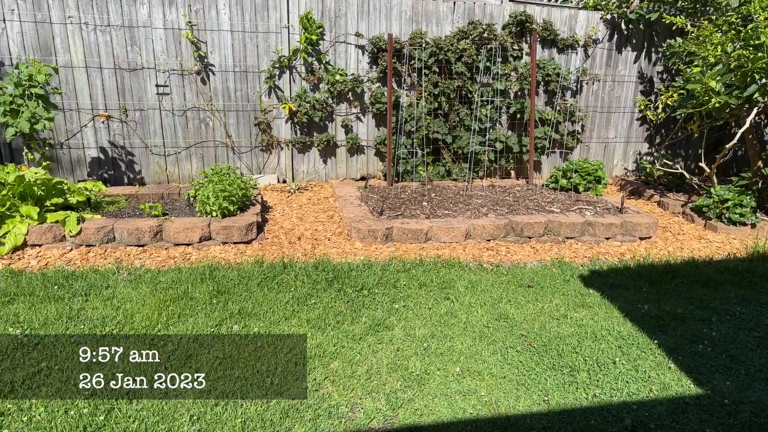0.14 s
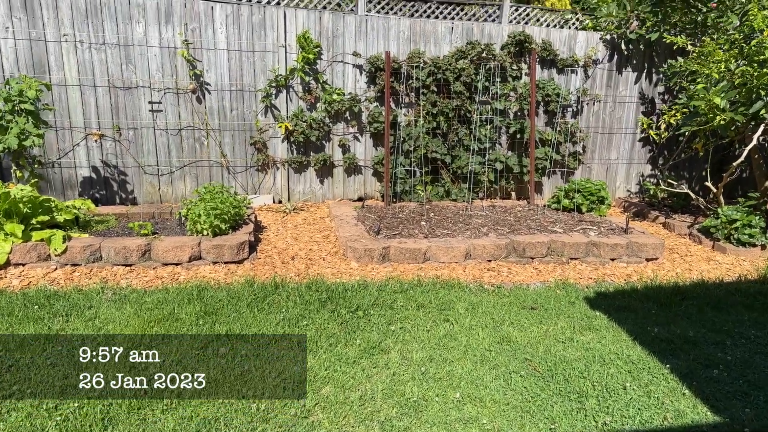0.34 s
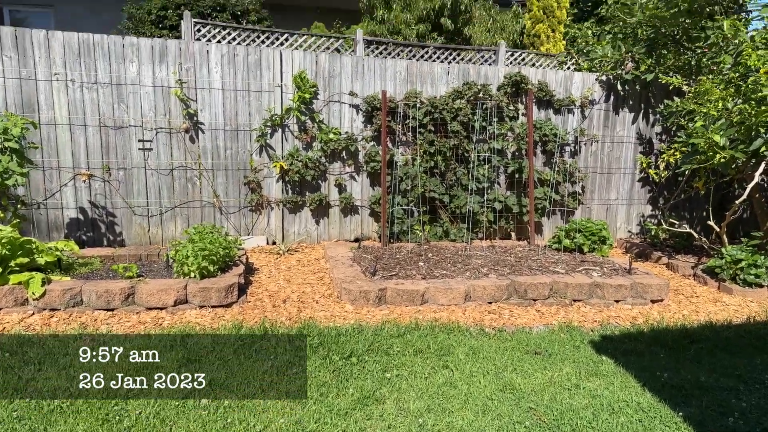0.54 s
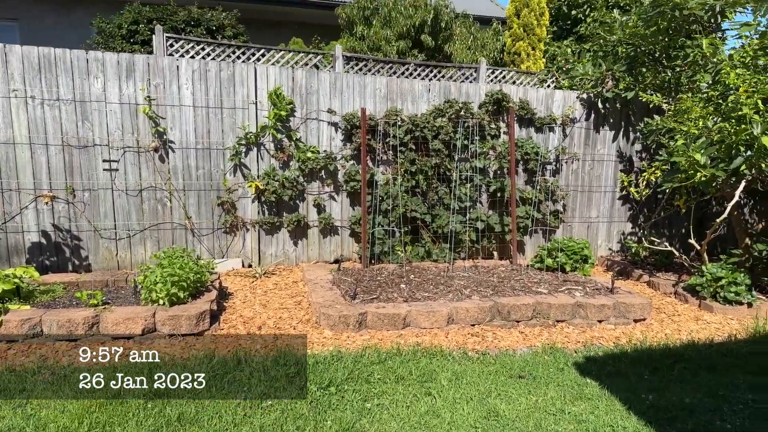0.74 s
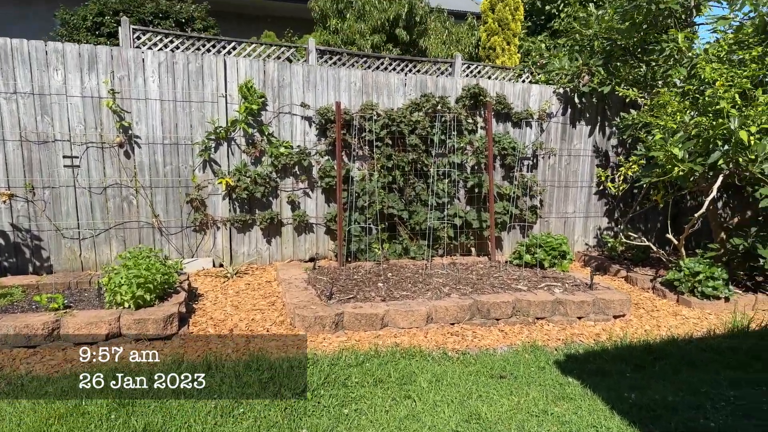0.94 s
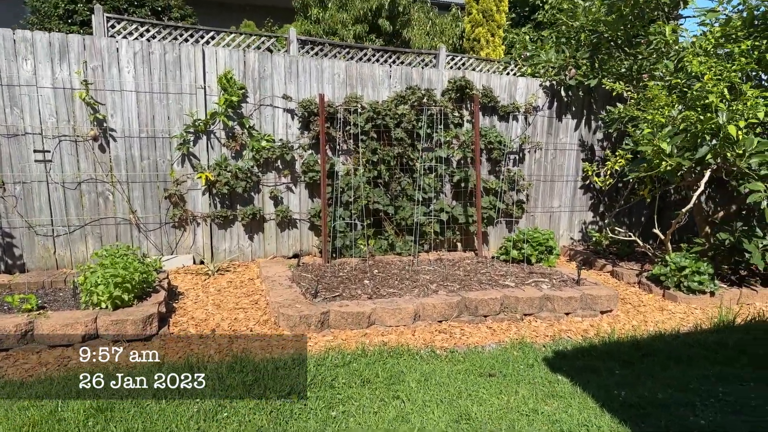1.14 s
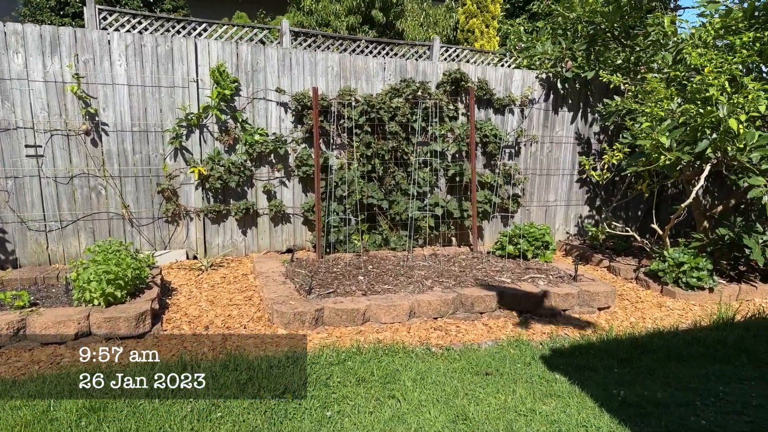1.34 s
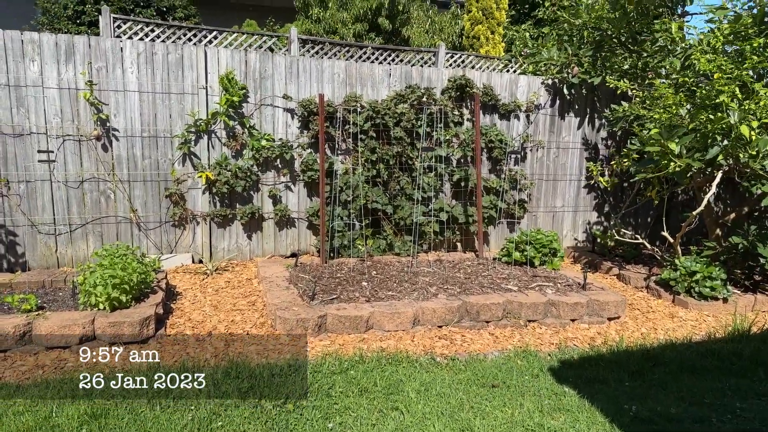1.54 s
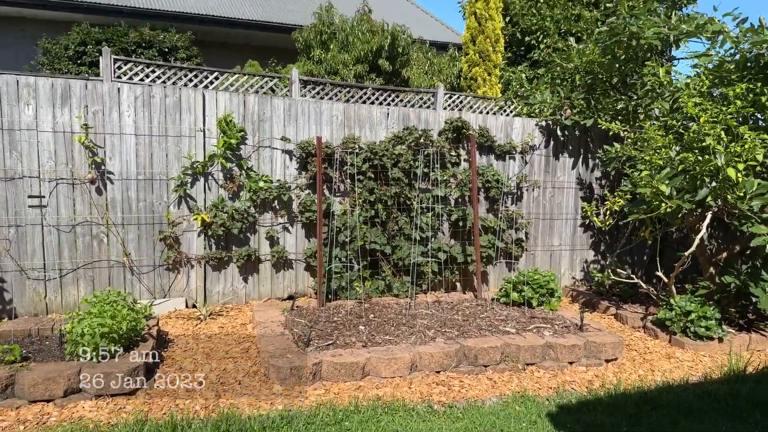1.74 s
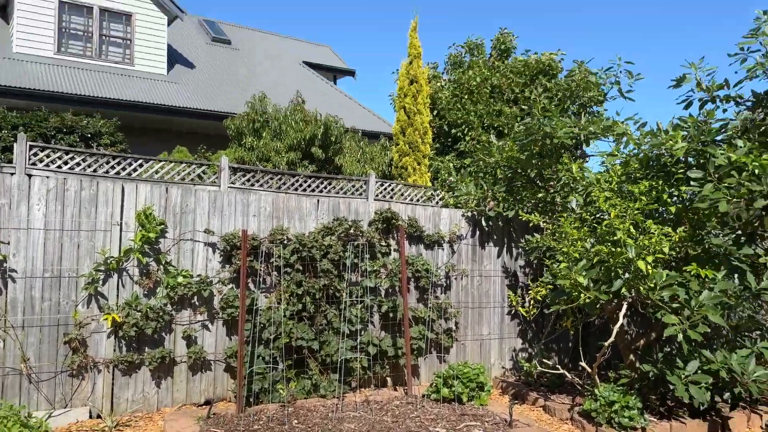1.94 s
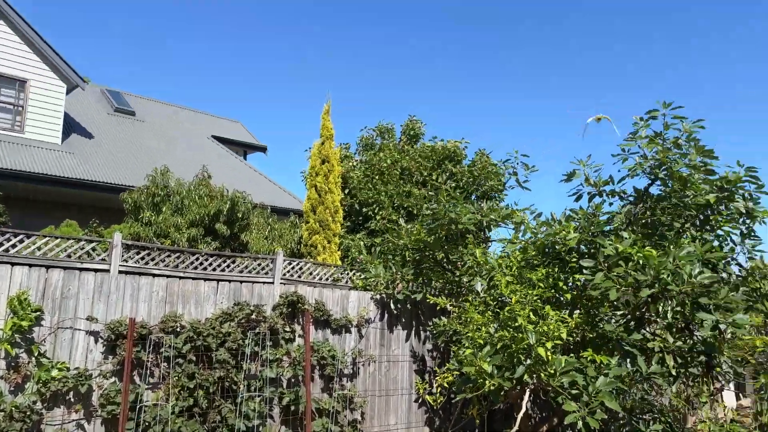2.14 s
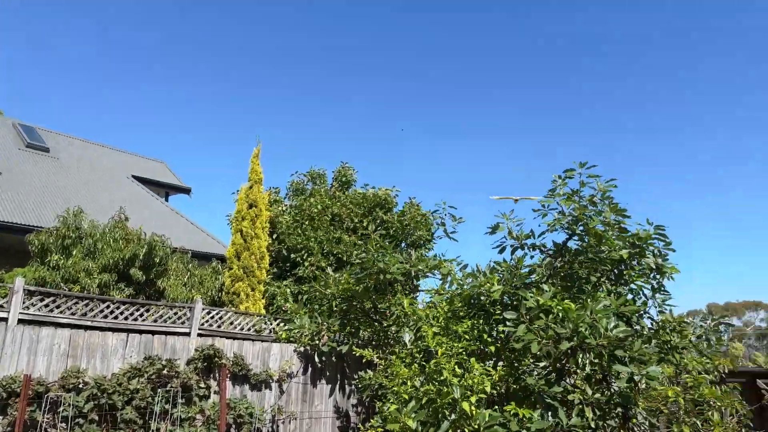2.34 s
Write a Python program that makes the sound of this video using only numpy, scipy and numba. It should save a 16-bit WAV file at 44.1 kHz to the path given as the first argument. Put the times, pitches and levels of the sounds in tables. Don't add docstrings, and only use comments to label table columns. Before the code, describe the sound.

A cockatoo screeches harshly twice over a backyard garden, with short echoes and light wind buffets

```python
import sys
import numpy as np
from scipy import signal
from scipy.fft import rfft, irfft
from scipy.io import wavfile
from numba import njit

SR = 44100
rng = np.random.default_rng(int(sys.argv[2]) if len(sys.argv) > 2 else 0)


def boost(x):
    u = np.asarray(x, float) / 20
    return 10 ** u


def generate_wav(signal):
    frames = np.transpose(np.atleast_2d(signal))
    scaled = np.clip(frames, -1, 1) * 32767
    pcm = np.round(scaled).astype(np.int16)
    wavfile.write(sys.argv[1], SR, pcm)


N = 105090


def rms_one(x):
    return x / np.sqrt(np.mean(x ** 2) + 1e-20)


def in_time(rows):
    s, *columns = np.transpose(rows)
    return [np.interp(np.arange(N) / SR, s, c) for c in columns]


def drift(rate_hz):
    r = np.exp(-2 * np.pi * rate_hz / SR)
    return rms_one(signal.lfilter([1], [1, -2 * r, r * r], rng.standard_normal(N + SR))[SR:])


def low_pass(x, order, cut_hz):
    return signal.sosfilt(signal.butter(order, cut_hz, fs=SR, output="sos"), x)


def band_pass(x, low_hz, top_hz):
    return signal.sosfilt(signal.butter(2, [low_hz, top_hz], "band", fs=SR, output="sos"), x)


def bump(t, centre_s, length_s):
    return np.exp(-((t - centre_s) / length_s * 2) ** 2)


@njit
def moving(x, c, r):
    y = np.zeros(len(x))
    for i in range(2, len(x)):
        y[i] = (1 - r * r) / 2 * (x[i] - x[i - 2]) + 2 * r * c[i] * y[i - 1] - r * r * y[i - 2]
    return y


def resonance(x, hz, width_hz):
    return moving(x, np.cos(2 * np.pi * np.clip(hz, 50, .45 * SR) / SR), np.exp(-np.pi * width_hz / SR))


def rings(source, table, stretch):
    wander, swell_db = .015, 1.5
    total = 0
    for k, (hz, width_hz, db) in enumerate(table):
        gain = (-1) ** k * boost(db + swell_db * drift(5.4))
        centre_hz = hz * stretch * (1 + wander * drift(10))
        total = total + gain * resonance(source, centre_hz, width_hz)
    return total


def voice_box(start_s):
    steady_hz, onset_hz, speed_up_s = 480, 110, .03
    rate_wander, jitter, spread_db, flutter_db, puff_decay_s = .12, .24, 2.5, 1.0, .002
    t = np.arange(N) / SR
    rate_hz = steady_hz + (onset_hz - steady_hz) * np.exp(-np.abs(t - start_s) / speed_up_s)
    rate_hz = rate_hz * np.exp(rate_wander * drift(12))
    gaps, sizes = rng.standard_normal((2, 3000))
    marks = np.cumsum(np.exp(jitter * gaps - jitter ** 2 / 2))
    pulses = np.zeros(N + 1)
    pulses[np.searchsorted(np.cumsum(rate_hz) / SR, marks)] = boost(spread_db * sizes)
    pulses = pulses[:N]
    puff_level = signal.lfilter([1], [1, -np.exp(-1 / (puff_decay_s * SR))], pulses)
    puffs = puff_level * rng.standard_normal(N)
    return np.array([rms_one(pulses), rms_one(puffs)]) * boost(flutter_db * drift(6.2))


def screech(effort, beak, chest, lower, upper, beak_rings, stretch_s):
    breath_db, beak_air_db = -7, -0.5
    pipe_cut_hz, voice_low_cut_hz = 5500, 340
    notch_width_hz, notch_depth = 1100, .85
    neck_stretch, release_s = 0.26, 0.0043
    start_s, end_s = effort[0][0], effort[-1][0]
    level_db, chest_db, gape_db, bright_db = in_time(effort)
    notch_hz, = in_time(beak)
    t = np.arange(N) / SR
    stretch = 1 - neck_stretch * np.exp(-np.abs(t - start_s) / stretch_s)
    pulses, air = voice_box(start_s)
    source = low_pass(pulses + boost(breath_db) * air, 2, pipe_cut_hz)
    upper_pipe = boost(gape_db) * rings(source, upper, stretch) * (-1) ** len(lower)
    pipe = upper_pipe + rings(source, lower, stretch)
    hiss = rings(pulses + boost(beak_air_db) * air, beak_rings, stretch) / 2
    voice = pipe - boost(chest_db) * rings(source, chest, stretch) + boost(bright_db) * hiss
    voice = voice - notch_depth * resonance(voice, notch_hz, notch_width_hz)
    voice = signal.sosfilt(signal.butter(4, voice_low_cut_hz, "high", fs=SR, output="sos"), voice)
    gate = (t >= start_s) * np.exp(-np.maximum(t - end_s, 0) / release_s)
    return voice / np.std(pipe) * boost(level_db) * gate


def hum():
    # f/Hz, density/dB per Hz
    spectrum = [(90, -51), (150, -3), (300, -4.5), (800, -7.5), (2000, -11), (5000, -14.5), (6000, -28),
                (15500, -33)]
    hz, db = np.transpose(spectrum)
    bins_hz = np.maximum(np.arange(N // 2 + 1) * SR / N, 1)
    colour = boost(np.interp(np.log(bins_hz), np.log(hz), db))
    return boost(-59.5) * rms_one(irfft(rfft(rng.standard_normal(N)) * colour, N))


def wind():
    # t/s, level/dB
    gusts = [(0.0, -59.5), (0.6, -58), (0.7, -56.5), (0.9, -61), (1.05, -52), (1.17, -60.5), (1.32, -53),
             (1.47, -52), (1.6, -61), (1.78, -52.5), (1.88, -48.5), (1.95, -60), (2.08, -57), (2.38, -61)]
    # t/s, level/dB, f/Hz, length/s
    buffets = [
        (0.47, -48, 230, .025),
        (1.11, -39, 65, .035),
        (1.249, -33, 75, .024),
        (2.235, -47, 60, .025),
    ]
    low_hz, top_hz, lump_db = 27.2, 110, 2
    gust_db, = in_time(gusts)
    rumble = band_pass(rng.standard_normal(N + SR), low_hz, top_hz)[SR:]
    out = boost(gust_db) * rms_one(rumble * boost(lump_db * drift(30)))
    t = np.arange(N) / SR
    for s, db, hz, length_s in buffets:
        out = out - boost(db) * bump(t, s, length_s) * np.cos(2 * np.pi * hz * (t - s))
    return out


def garden(x):
    # t/s, level/dB
    walls = [
        (0.034, -14),
        (0.069, -21.5),
        (.16, -26.5),
    ]
    echo_db, t60_s, start_s, rise_s, cut_hz = -4.5, 0.46, 0.004, 0.0067, 6750
    board_hz, board_width_hz, board_db = 1220, 555, 0.5
    t = np.arange(SR) / SR
    late_s = np.maximum(t - start_s, 0)
    tail = rng.standard_normal(SR) * boost(-60 * late_s / t60_s) * (1 - np.exp(-late_s / rise_s))
    tail = boost(echo_db) * tail / np.sqrt(np.sum(tail ** 2))
    for s, db in walls:
        tail[int(s * SR)] += boost(db)
    tail = low_pass(tail, 1, cut_hz)
    tail = tail + boost(board_db) * resonance(tail, board_hz + 0 * t, board_width_hz)
    return signal.fftconvolve(x, tail)[:N]


def lawn(x):
    # t/s, lag/ms
    lag = [(0.0, 4.51), (0.5, 5.9), (0.75, 6.74), (1.1, 9.4), (1.4, 7.8), (1.65, 6.4), (1.85, 5.2),
           (2.05, 4.47)]
    lag_ms, = in_time(lag)
    late = np.interp(np.arange(N) - lag_ms * SR / 1000, np.arange(N), x)
    return boost(-5) * low_pass(late, 1, 6000)


def ringing_swells():
    # t/s, length/s, f/Hz, width/Hz, level/dB
    brief_bands = [(0.124, 0.18, 7230, 250, -61.5), (0.135, 0.12, 4545, 149, -55),
                   (0.486, 0.12, 2623, 119, -26.5), (0.713, 0.11, 1993, 119, -31),
                   (1.335, 0.088, 6200, 1300, -47), (1.588, 0.11, 2480, 200, -25),
                   (1.786, 0.065, 3430, 300, -31), (1.989, 0.017, 1062, 110, -31)]
    t = np.arange(N) / SR
    out = np.zeros(N)
    for s, length_s, hz, width_hz, db in brief_bands:
        once = resonance(rng.standard_normal(N), hz + 0 * t, width_hz)
        twice = resonance(once, hz + 0 * t, width_hz)
        out = out + boost(db) * bump(t, s, length_s) * rms_one(twice)
    return out


def rustles():
    # t/s, length/s, level/dB
    swishes = [(0.135, .015, -65), (0.247, 0.012, -65), (0.332, 0.019, -44.5), (0.852, 0.13, -68),
               (1.062, 0.035, -80), (1.148, .03, -75.5), (1.438, 0.011, -44), (1.555, 0.021, -45),
               (1.737, 0.032, -51.5), (2.247, .06, -77)]
    low_hz, top_hz, grain_db = 5670, 11800, 3
    t = np.arange(N) / SR
    grains = rng.standard_normal(N) * boost(grain_db * drift(300))
    air = rms_one(band_pass(grains, low_hz, top_hz))
    return air * sum(boost(db) * bump(t, s, length_s) for s, length_s, db in swishes)


def scene():
    # t/s, level/dB, chest/dB, gape (upper windpipe)/dB, beak brightness/dB
    effort_1 = [(0.0, -57, -3, -3, 2), (0.028, -46.5, 4, -26, -5), (0.086, -37.5, -0.5, -3, -1.5),
                (0.23, -34, -4.5, -2, 1), (0.268, -26.5, -2.5, 0, 5.5), (0.522, -30, -2.5, 3.5, 5),
                (0.67, -30.5, -4, -1, -1), (0.72, -25, 0, -2.5, 3.5), (0.745, -29.5, -15, 1, 6)]
    effort_2 = [(1.255, -53, 19, 1.5, -3), (1.274, -32.5, 11.5, -5, 1), (1.3, -25, 3, -5.5, 1),
                (1.4, -26.5, 0.5, 1.5, 0), (1.58, -23.5, 0.5, 1, 3), (1.68, -28.5, 7, 2, -1),
                (1.79, -26, 3, 2.5, -2.5), (1.93, -30, 6, -0.5, -6.5), (1.998, -32.5, 5, 3, 4.5)]
    # t/s, f/Hz
    beak_1 = [(0.0, 5700), (0.12, 6200), (0.24, 6300), (0.3, 6940), (0.5, 7700), (0.56, 8700), (0.75, 8000)]
    beak_2 = [(1.26, 4263), (1.33, 4740), (1.41, 5950), (1.55, 6200), (1.7, 7150), (2.0, 7270)]
    # f/Hz, width/Hz, level/dB
    chest_1 = [(392, 170, -17), (635, 164, -10), (928, 175, -4.5)]
    chest_2 = [(638, 215, -11), (843, 108, -3), (983, 106, -6.5)]
    lower_1 = [(1314, 265, -10.5), (1886, 252, 0.5), (2250, 256, -1.5), (2575, 310, -1)]
    lower_2 = [(1356, 380, -8), (1775, 187, 3.7), (2396, 292, 1.6)]
    upper_1 = [(3165, 160, -5.5), (3580, 196, -6), (5010, 345, -7), (5240, 620, -13), (6200, 930, -17)]
    upper_2 = [(3396, 490, -5.5), (4470, 310, -7.5), (5200, 1100, -15.5)]
    beak_rings_1 = [(7350, 390, -23), (9140, 610, -25), (10530, 1200, -30.5), (12100, 610, -31),
                    (14300, 1700, -41.5)]
    beak_rings_2 = [(7250, 540, -19.5), (8740, 400, -18), (9660, 910, -27), (11500, 700, -29),
                    (13200, 3000, -38)]
    first = screech(effort_1, beak_1, chest_1, lower_1, upper_1, beak_rings_1, stretch_s=0.096)
    second = screech(effort_2, beak_2, chest_2, lower_2, upper_2, beak_rings_2, stretch_s=0.029)
    echoes = garden(first + boost(-2.5) * second)
    bird = first + second + ringing_swells()
    return (bird + lawn(bird) + echoes + rustles() + hum() + wind())[None]


def band_limit(x):
    return signal.sosfilt(signal.butter(12, 15710, fs=SR, output="sos"), x)


def record(dry):
    return band_limit(dry)


dry = scene()
out = record(dry)
generate_wav(out)
```